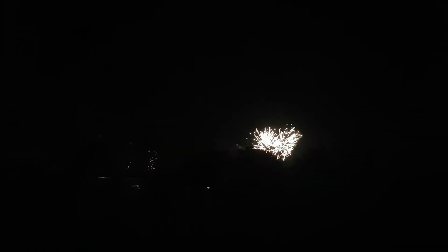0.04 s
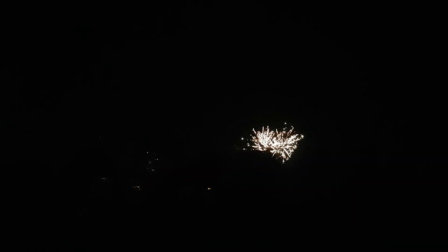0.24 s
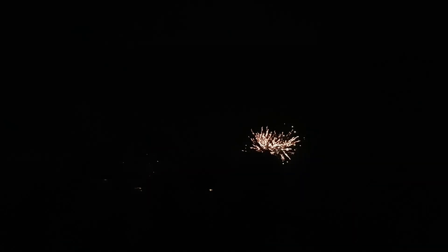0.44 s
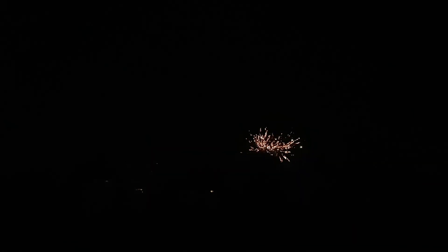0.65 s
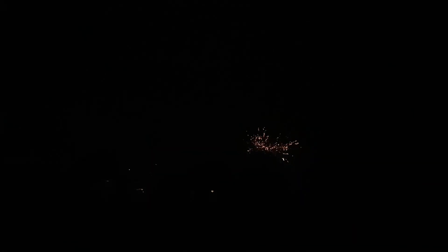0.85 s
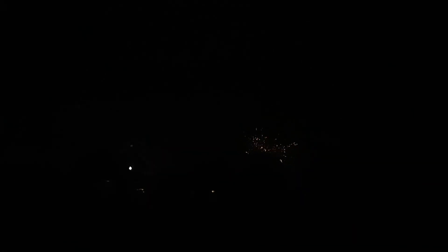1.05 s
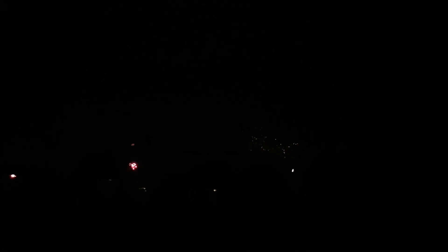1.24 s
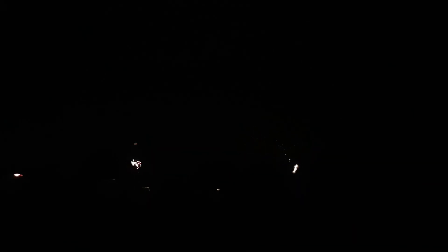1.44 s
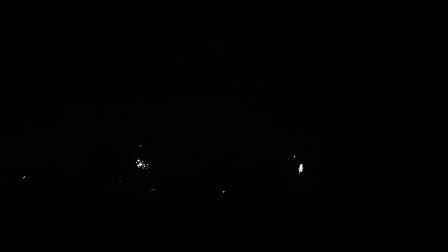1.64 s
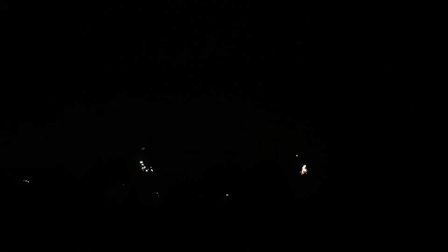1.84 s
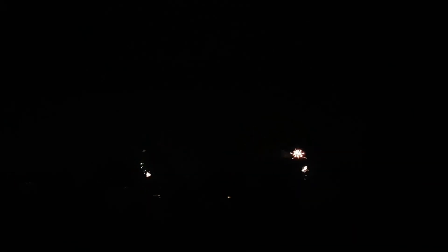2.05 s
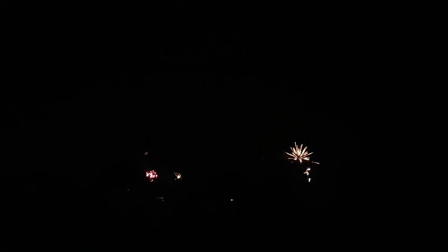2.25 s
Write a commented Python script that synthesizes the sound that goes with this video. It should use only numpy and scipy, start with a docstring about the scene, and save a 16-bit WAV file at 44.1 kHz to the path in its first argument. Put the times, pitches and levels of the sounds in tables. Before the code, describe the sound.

Fireworks over a town at night, mostly from the right. Small pops swell into dense crackle around 0.3 s; a huge clipped bang hits at 0.37, with rapid cracks until 0.55. A deep shell booms raggedly at 0.78 and rolls away. After a thinner gap, strong bangs cluster at 1.3 and 1.63, then weaker pops, a very faint wavering rocket whistle, distant thuds and rumble until 2.3.

```python
"""Sharp firework bangs over a town at night: pressure swings with shock fronts, scattered back by houses.
One deep shell booms, bursts raggedly and rolls away; a near cloud of crackling stars swells in tiny pops.
Farther crackle, murmur and rumble are dense random impulses through filters; a faint rocket whistles as a
wavering sine. Two close microphones hear most of it from the right; the strongest bang overloads them."""
import sys
import numpy as np
from scipy import signal
from scipy.fft import rfft, irfft, next_fast_len
from scipy.io import wavfile
from scipy.ndimage import map_coordinates

SR = 44100
rng = np.random.default_rng(int(sys.argv[2]) if len(sys.argv) > 2 else 0)


def int16_out(signal):
    """Quantize to a 16-bit WAV file."""
    q = np.round(np.clip(np.atleast_2d(signal).T, -1, 1) * 32767)
    wavfile.write(sys.argv[1], SR, q.astype(np.int16))


N = 101430  # samples, 2.3 s


def amp(db):
    """Decibels to gain."""
    return 10 ** (np.asarray(db) / 20)


def unit(x):
    """Scale to rms 1 over both channels."""
    return x / np.sqrt(np.mean(x ** 2) + 1e-20)


def along(points, hz):
    """Interpolate (hz, value) points on a log frequency axis."""
    point_hz, values = np.transpose(points)
    return np.interp(np.log(hz + 1), np.log(point_hz + 1), values)


def curves(rows):
    """One value per sample for each column after the time."""
    point_s, *columns = np.transpose(rows)
    t = np.arange(N) / SR
    return [np.interp(t, point_s, column) for column in columns]


def wobble(knots_per_s):
    """A smooth random curve through normally distributed knots."""
    knots = rng.standard_normal(int(N * knots_per_s / SR) + 4)
    return map_coordinates(knots, [np.arange(N) * knots_per_s / SR])


def filtered(x, response):
    """Multiply the spectrum by a zero-phase response of frequency."""
    size = next_fast_len(N + SR // 4)
    hz = np.fft.rfftfreq(size, 1 / SR)
    return irfft(rfft(x, size) * response(hz), size)[..., :N]


def coloured(x, points, size=4096):
    """Causal minimum-phase filter through (hz, gain_db) points, by folding the cepstrum."""
    gain = amp(along(points, np.fft.rfftfreq(size, 1 / SR)))
    cepstrum = irfft(np.log(gain))
    cepstrum[1:size // 2] *= 2
    cepstrum[size // 2 + 1:] = 0
    impulse_response = irfft(np.exp(rfft(cepstrum)))
    return signal.fftconvolve(x, impulse_response[None], axes=1)[:, :N]


def dull(x, cutoff_hz, order=2):
    """Causal low-pass."""
    b, a = signal.butter(order, min(cutoff_hz, SR / 2 - 1), fs=SR)
    return signal.lfilter(b, a, x)


def arrivals(times_s, sizes, bearings, lean=0):
    """Impulses at left and right microphones; bearing (-1 left to 1 right) sets the delay, lean the balance."""
    mic_travel_s = .00032  # sound's travel time between the microphones
    lag_s = np.clip(bearings, -1, 1) * mic_travel_s / 2
    channels = []
    for side in (1, -1):
        index = np.abs(np.round((times_s + side * lag_s) * SR)).astype(int)
        channels.append(np.bincount(index, sizes * (1 + side * lean), N)[:N])
    return np.array(channels)


def swarm(rate_per_s, scatter_db, bearing, spread, count=14000):
    """Impulses at random times, of random sign, size, bearing and left-right balance."""
    uneven = 0.22  # how unequally an arrival hits the two microphones
    times_s = np.cumsum(rng.exponential(size=count)) / rate_per_s
    keep = times_s < N / SR
    size, turn, sign, lean = rng.standard_normal((4, count))[:, keep]
    sizes = np.sign(sign) * amp(scatter_db * np.minimum(size, 2))
    return arrivals(times_s[keep], sizes, bearing + spread * turn, uneven * lean)


def bangs():
    """Each is a pressure swing with a shock front on its first fall, the front dulled by the air on its way."""
    # start_s, level_db, pitch_hz of the swing, relative shock_db, echo_db, bearing -1..1, air_lowpass_hz
    bang_rows = [(.116, -31, 905, -8, -13, .8, 3270), (.154, -29.5, 764, -20.5, -10, .8, 3500),
                 (.2405, -19.5, 894, -1.5, -4, .8, 2500), (0.3706, 12.5, 607, -1, -22, .2, 6450),
                 (0.3912, -4, 1188, -8, -14, .6, 5540), (.4175, -13.5, 585, 2.5, -5, .4, 3970),
                 (0.4319, -5.5, 407, -3, -7.5, .1, 2930), (.4413, -9, 452, 2, -17.5, .2, 2970),
                 (.494, 0, 579, -9.5, -11.5, .25, 6500), (.541, -19.5, 652, 8, -7.5, .6, 2900),
                 (0.555, -18.5, 461, 6, -15.5, .6, 2800), (.699, -16, 389, -15.5, -12, .3, 2000),
                 (.868, -13.5, 718, -13, -12.5, .6, 2550), (0.8948, -24.5, 987, -5.5, -11.5, .6, 6080),
                 (1.124, -30.5, 560, 4, 3, .6, 2240), (1.305, -1.5, 401, -12, -6, 1, 4200),
                 (1.3245, -7, 287, -13, -6, .8, 2570), (1.3409, -3.5, 320.7, -3, -6, .9, 3000),
                 (1.376, -19.5, 780, 2, -2, .9, 2630), (1.447, -18.5, 520, -1.5, 0.5, .8, 2020),
                 (1.570, -23.5, 399, -19, 5, .9, 2030), (1.598, -13.5, 480, -4.5, -9, .9, 2450),
                 (1.6326, -4, 654, -6, -11, 1, 2950), (1.686, -24.5, 728, 13.5, -0.5, .9, 3080),
                 (1.7025, -14.5, 793, -29, -2, .9, 3180), (1.818, -16, 370, -17, -24, .6, 2016),
                 (1.898, -13.5, 954, -28, -8.5, .9, 2000), (1.996, -13, 450, 1, -5.5, 1, 2270),
                 (2.024, -21.5, 370, 1.5, 0.5, .9, 1810), (2.277, -26, 352, -12.5, 8, .8, 2000),
                 (2.289, -18, 603, -2, -8, 1, 2500)]
    swing_db, swing_cycles = -4.5, 0.61  # common to all bangs; cycles until strongest
    shock_base_db, shock_s = 7, 0.00033  # common to all bangs
    out = np.zeros((2, N))
    t = np.arange(SR // 16) / SR
    for start_s, level_db, pitch_hz, shock_db, echo_db, bearing, air_hz in bang_rows:
        u = (t - .5 / pitch_hz) / shock_s
        shock = dull((u > 0) * (1 - u) * np.exp(-np.abs(u)), air_hz, order=3)
        body = amp(swing_db) * swing(t, pitch_hz, swing_cycles)
        blast = body - amp(shock_base_db + shock_db) * shock
        out += heard(amp(level_db) * blast, start_s, echo_db, bearing)
    return out


def swing(t, pitch_hz, cycles):
    """A blast's pressure swing, strongest after the given cycles, then dying away."""
    low_cut_share = 0.09  # a blast holds little below this share of its pitch
    age = t * pitch_hz / cycles
    wave = np.sin(2 * np.pi * pitch_hz * t) * (age * np.exp(1 - age)) ** 2
    return wave - dull(wave, low_cut_share * pitch_hz, order=1)


def heard(blast, start_s, echo_db, bearing):
    """A blast arrives directly, followed by its own echoes."""
    paths = arrivals(np.array([start_s]), np.ones(1), np.array([bearing]))
    start = round(start_s * SR)
    paths[:, start:] += amp(echo_db) * echoes()[:, :N - start]
    return signal.fftconvolve(paths, blast[None], axes=1)[:, :N]


def echoes():
    """Near walls, streets and the far town answer one blast with many small copies."""
    # share_db, echoes_per_s, build_up_s, t60_s, lowpass_hz
    walls = [(4, 2400, 0.00069, 0.089, 15000), (3, 900, 0.027, 0.33, 8600), (-5, 2500, 0.033, 4.05, 1370)]
    t = np.arange(N) / SR
    out = 0
    for share_db, rate_per_s, build_s, t60_s, lowpass_hz in walls:
        copies = swarm(rate_per_s, scatter_db=3, bearing=0.79, spread=0.54)
        copies = copies * (1 - np.exp(-t / build_s)) * 1e-3 ** (t / t60_s)
        energy = np.sum(copies ** 2) / 2  # per microphone
        out = out + amp(share_db) * dull(copies / np.sqrt(energy + 1e-20), lowpass_hz)
    return out


def shell():
    """The deep shell: a slow pressure swing, a ragged crunch, and a low roll over the town."""
    roll_tone = [(25, -29), (50, -20.5), (80, 7), (130, -9.5), (190, -11.5), (400, -36.5), (1500, -86)]  # hz, relative gain_db
    crunch_decays = [(-22, .07), (-24, 0.59)]  # near and far burst: level_db, t60_s
    crunch_tone = [(60, -55), (300, 13), (800, 6), (1400, 3), (2100, 1), (4000, -16.5), (8000, -41),
                   (16000, -76)]  # hz, relative gain_db
    shell_s, pitch_hz, cycles = .7803, 128, 0.71
    thump_db, echo_db = -6, -11.5
    roll_db, roll_t60_s, roll_rise_s = -29, 1.7, 0.031
    crunch_rise_s = 0.0027

    blast = swing(np.arange(SR // 10) / SR, pitch_hz, cycles)
    thump = amp(thump_db) * heard(blast, shell_s, echo_db, bearing=.1)

    t = np.maximum(np.arange(N) / SR - shell_s, 0)
    roll_level = (1 - np.exp(-t / roll_rise_s)) * amp(roll_db - 60 * t / roll_t60_s)
    roll = roll_level * unit(coloured(swarm(1200, scatter_db=2.5, bearing=0.15, spread=0.6), roll_tone))

    crunch_level = sum(amp(level_db - 60 * t / t60_s) for level_db, t60_s in crunch_decays)
    crunch_level = crunch_level * (1 - np.exp(-(t / crunch_rise_s) ** 2))
    grains = swarm(3000, scatter_db=1.5, bearing=0.37, spread=1.0)
    return thump + roll + crunch_level * unit(coloured(grains, crunch_tone))


def cloud():
    """Crackling stars nearby: hundreds of tiny pops swell, hold and die out, in uneven clusters."""
    pop_tone = [(30, -44.5), (200, -43), (450, -3.5), (900, 2), (1400, 1), (2300, 3), (3300, -10),
                (5000, -14), (7500, -26.5), (10000, -48.5), (16000, -63)]  # hz, relative gain_db
    peak_s, peak_db, hold_s = 0.29, -19.5, 0.1
    rise_db_per_s, fall_db_per_s = 121.5, 82
    clump_db, clump_knots_per_s = 1.2, 70
    t = np.arange(N) / SR - peak_s
    rise_db = rise_db_per_s * np.minimum(t, 0)
    fall_db = fall_db_per_s * np.maximum(t - hold_s, 0)
    level_db = peak_db + rise_db - fall_db + clump_db * wobble(clump_knots_per_s)
    pops = swarm(1800, scatter_db=0, bearing=.85, spread=.4)
    return amp(level_db) * unit(coloured(pops, pop_tone))


def crackle():
    """Farther crackling stars blur into a wash of pops."""
    level_rows = [(0, -38.5), (.14, -59.5), (.55, -46.5), (.66, -43.5), (1.0, -46.5), (1.14, -46),
                  (1.28, -49), (1.37, -29.5), (1.48, -37.5), (1.6, -34), (1.71, -33), (1.78, -43),
                  (1.95, -49), (2.15, -40), (2.2, -38), (2.3, -36.5)]  # time_s, relative level_db
    pop_tone = [(30, -50), (200, -2.5), (450, 3), (900, 0), (1400, 2), (2200, 2.5), (3300, -11),
                (5000, -15.5), (7500, -35.5), (10000, -58.5), (16000, -82.5)]  # hz, relative gain_db
    offset_db = 1.5
    level_db, = curves(level_rows)
    pops = swarm(4500, scatter_db=4.5, bearing=.7, spread=0.4)
    return amp(level_db + offset_db) * unit(coloured(pops, pop_tone))


def murmur():
    """Far fireworks merge into dull, dense thuds."""
    level_rows = [(0, -41), (.3, -28), (.5, -29.5), (.7, -42), (1.2, -41.5), (1.5, -29), (1.7, -29),
                  (1.95, -40.5), (2.3, -37)]  # time_s, level_db
    thud_tone = [(25, -41), (70, -24.5), (170, -16), (300, 2), (480, -6), (700, -3), (1100, -16),
                 (2200, -15), (4000, -32.5), (8000, -74.5), (16000, -61.5)]  # hz, relative gain_db
    level_db, = curves(level_rows)
    thuds = swarm(1800, scatter_db=6, bearing=0.67, spread=0.86)
    return amp(level_db) * unit(coloured(thuds, thud_tone))


def rumble():
    """Low, shapeless thunder of many reports crossing the town."""
    level_rows = [(0, -72), (.35, -59), (.44, -35), (.56, -49), (.66, -53), (.74, -42.5), (1.25, -41),
                  (1.36, -32), (1.65, -37), (1.95, -44), (2.3, -46.5)]  # time_s, level_db
    bass_tone = [(25, -11.5), (50, -10), (100, 1), (170, 0), (300, -12), (1000, -61.5), (3000, -94)]  # hz, relative gain_db
    level_db, = curves(level_rows)
    reports = swarm(2000, scatter_db=-4.5, bearing=0, spread=1.0)
    return amp(level_db) * unit(coloured(reports, bass_tone))


def whistle():
    """A faint far rocket: a sine whose pitch and level waver separately per channel, blurred by many paths."""
    whistle_rows = [(1.0, 3170, -73), (1.17, 3120, -57), (1.28, 3014, -49.5), (1.6, 2957, -71),
                    (1.85, 3160, -49.5), (2.0, 3053, -47), (2.3, 2750, -60)]  # time_s, mean pitch_hz, mean level_db
    waver_share, waver_db = .022, 2.4
    pitch_hz, level_db = curves(whistle_rows)
    channels = []
    for _ in range(2):
        wavering_hz = pitch_hz * (1 + waver_share * wobble(220))
        phase = 2 * np.pi * np.cumsum(wavering_hz) / SR
        channels.append(amp(level_db + waver_db * wobble(31)) * np.sin(phase))
    return np.array(channels)


def scene():
    """Everything in the night sky."""
    return bangs() + shell() + cloud() + crackle() + murmur() + rumble() + whistle()


def record(dry):
    """Microphones differ in tone; peaks clip; the deepest bass and all above the band limit are lost."""
    right_over_left = [(60, -1.5), (250, 0), (600, 3), (1100, 2.5), (2200, 6), (8000, 2.5)]  # hz, right-to-left gain_db
    clip_level, top_hz, low_cut_hz = .95, 16100, 41.3

    def balance(hz):
        return amp(along(right_over_left, hz) * np.array([[-.5], [.5]]))

    def band(hz):
        return (hz < top_hz) * hz ** 2 / np.hypot(hz ** 2, low_cut_hz ** 2)

    clipped = np.clip(filtered(dry, balance), -clip_level, clip_level)
    return filtered(clipped, band)


dry = scene()
out = record(dry)
int16_out(out)
```